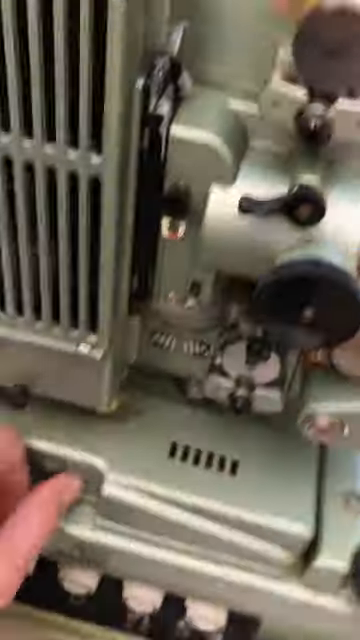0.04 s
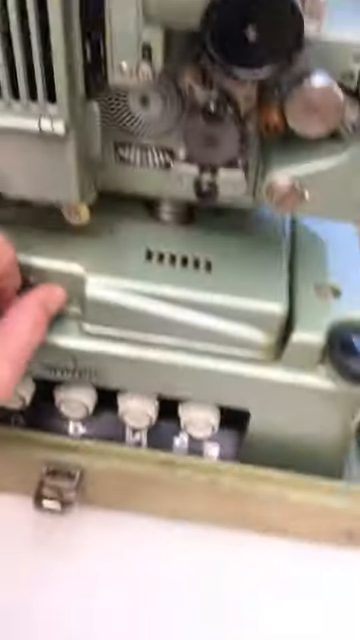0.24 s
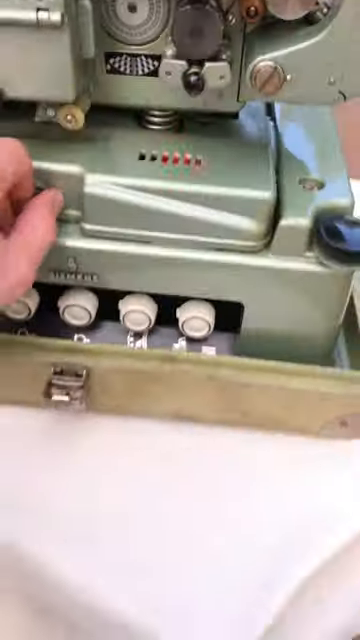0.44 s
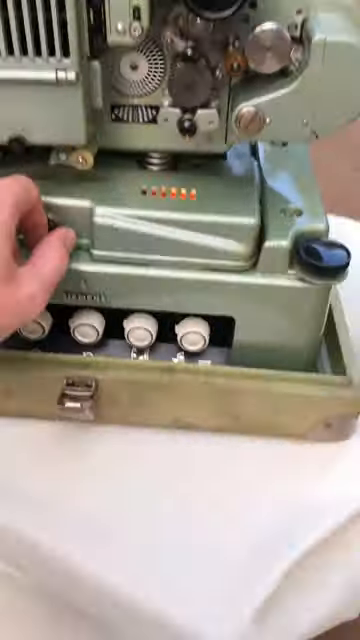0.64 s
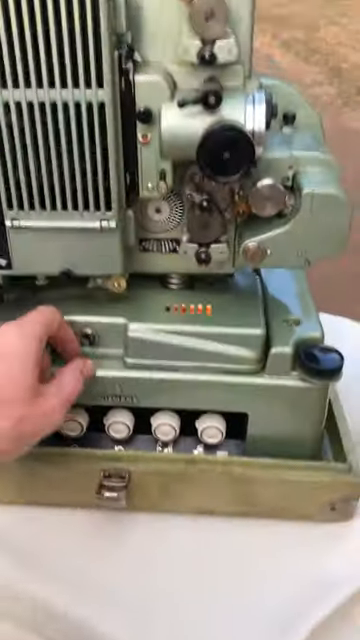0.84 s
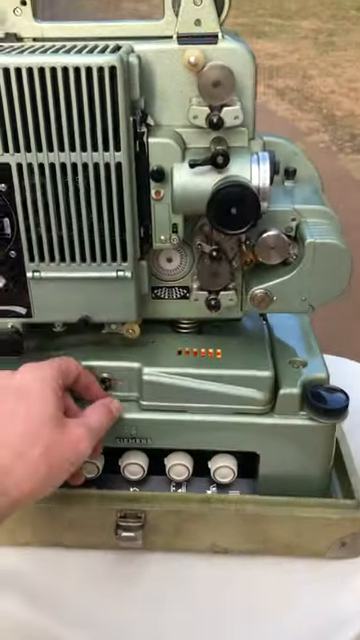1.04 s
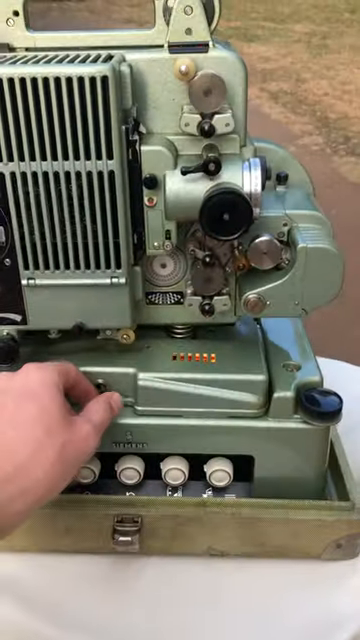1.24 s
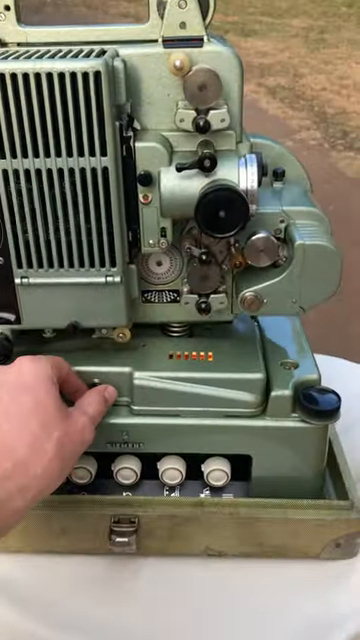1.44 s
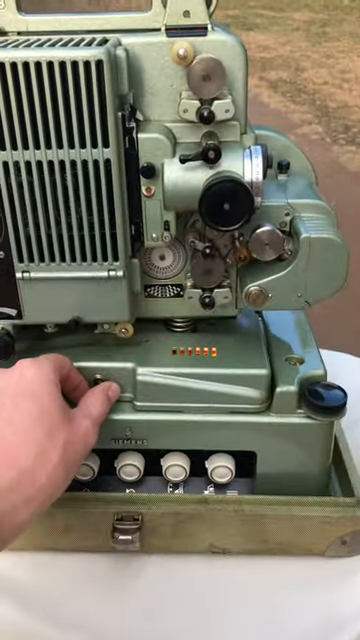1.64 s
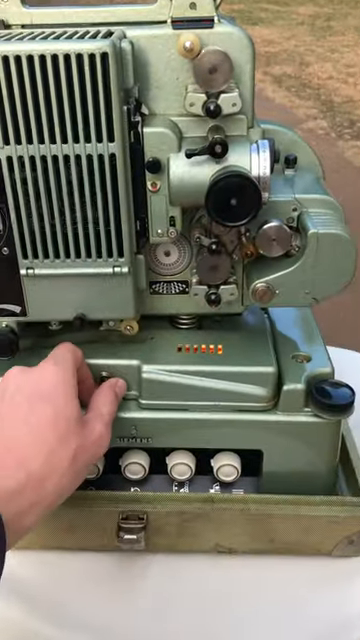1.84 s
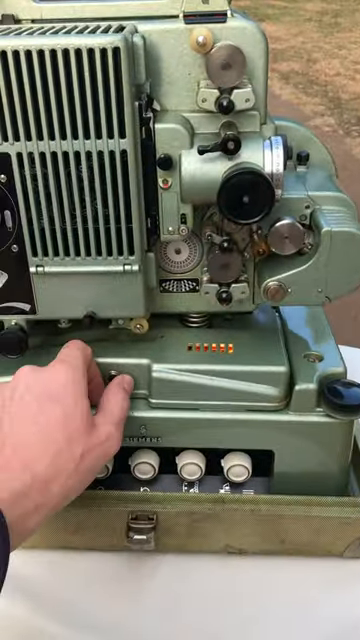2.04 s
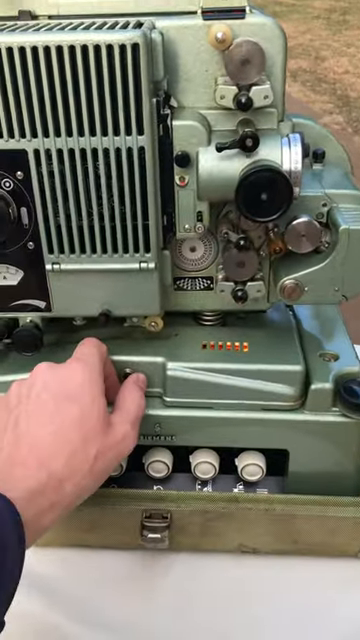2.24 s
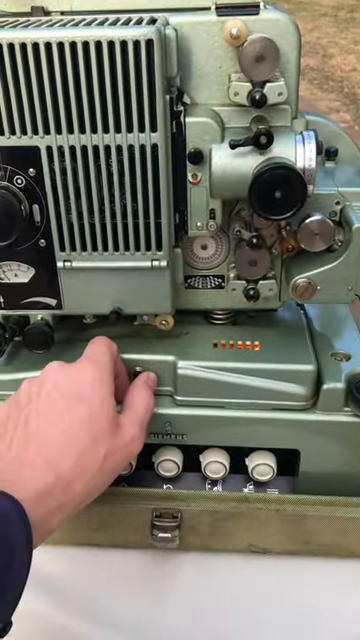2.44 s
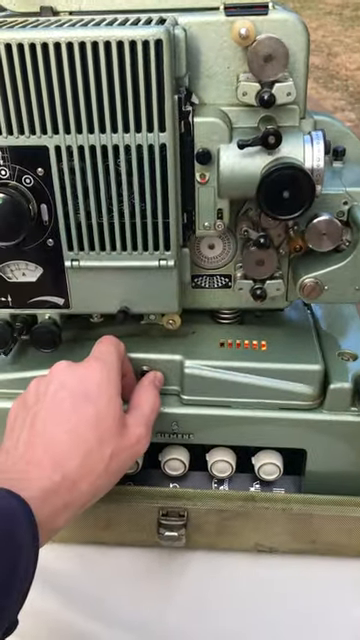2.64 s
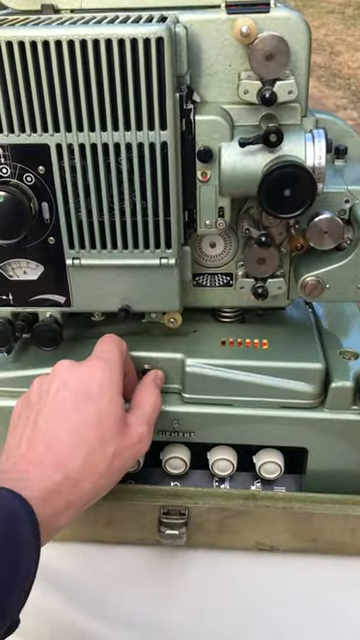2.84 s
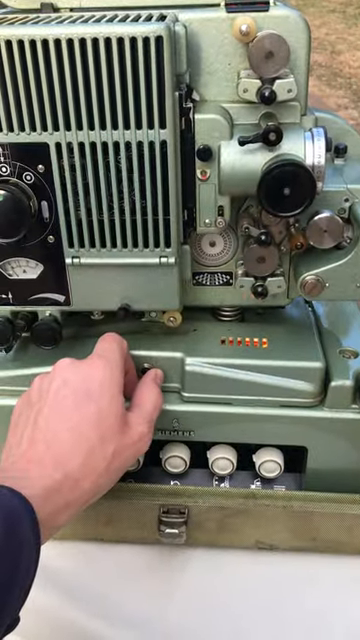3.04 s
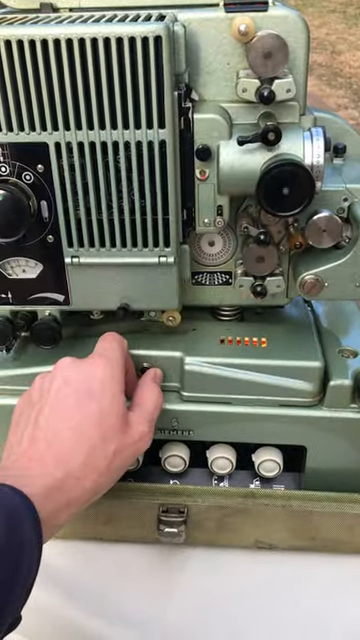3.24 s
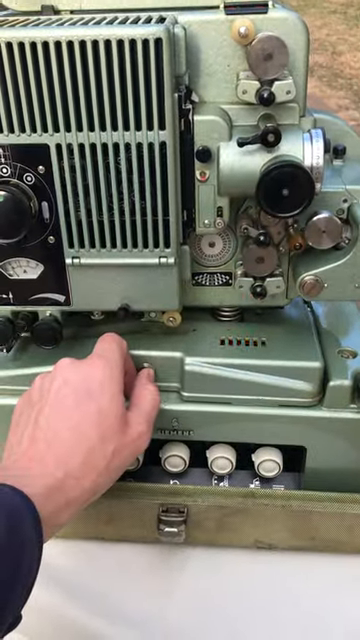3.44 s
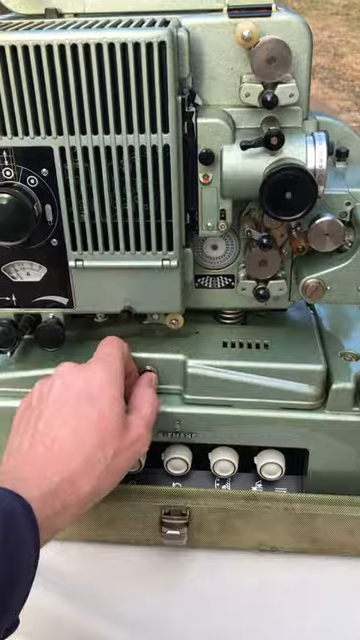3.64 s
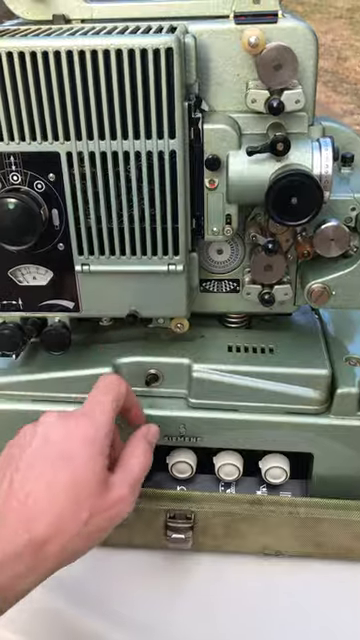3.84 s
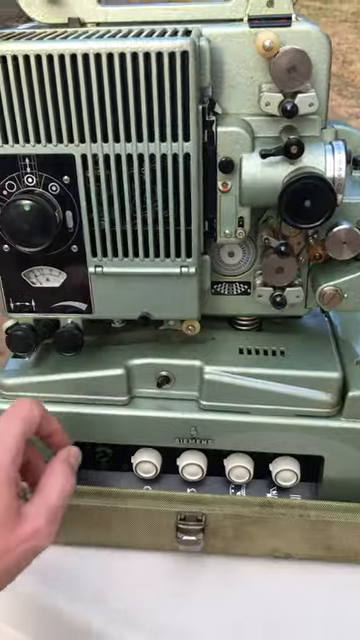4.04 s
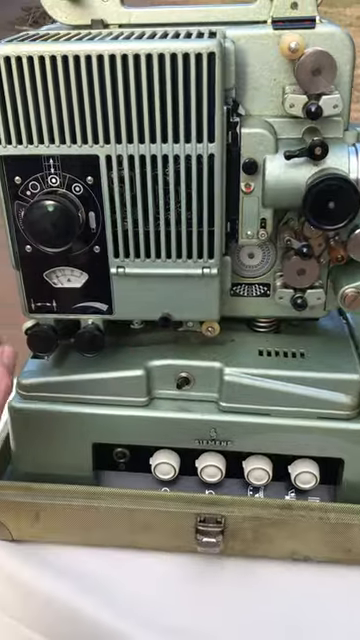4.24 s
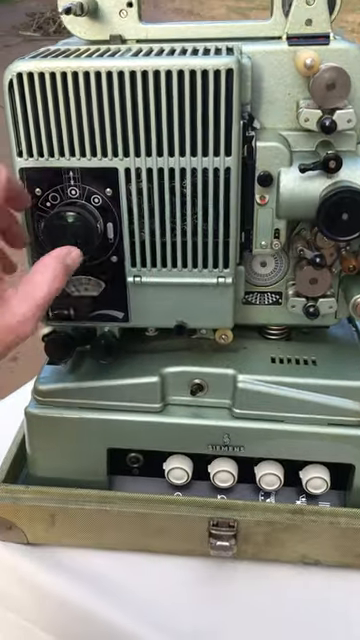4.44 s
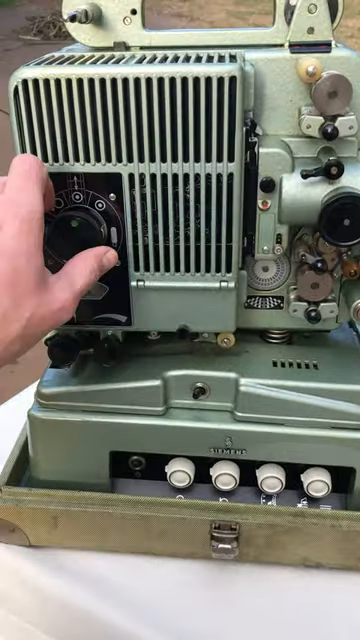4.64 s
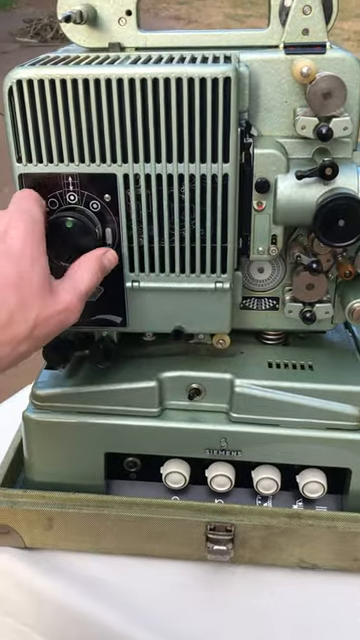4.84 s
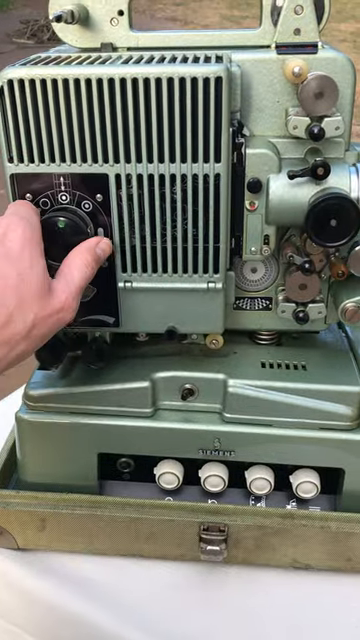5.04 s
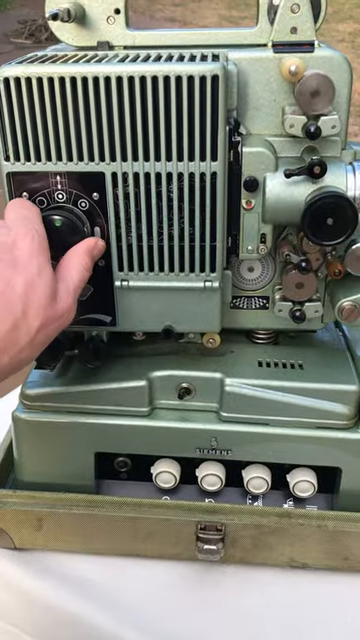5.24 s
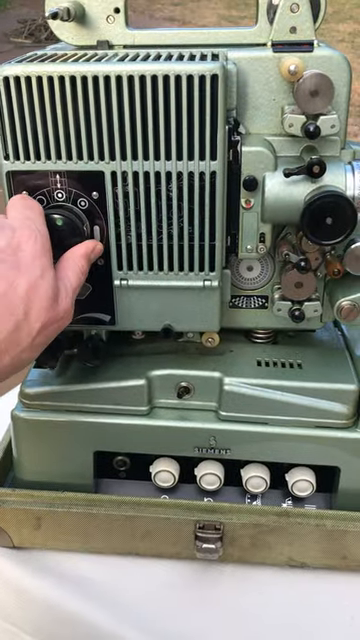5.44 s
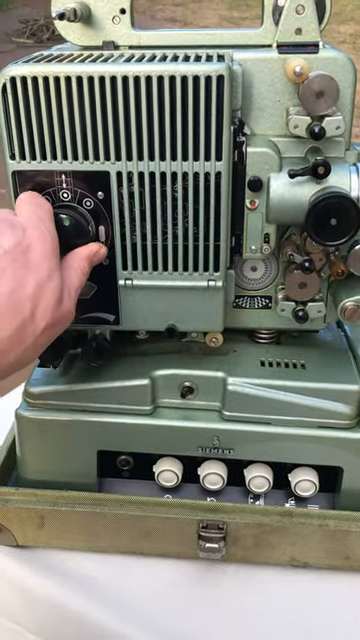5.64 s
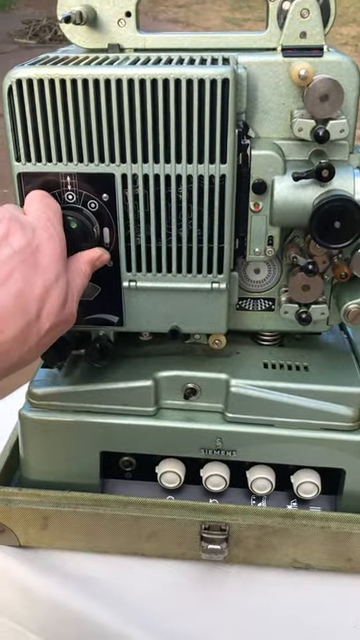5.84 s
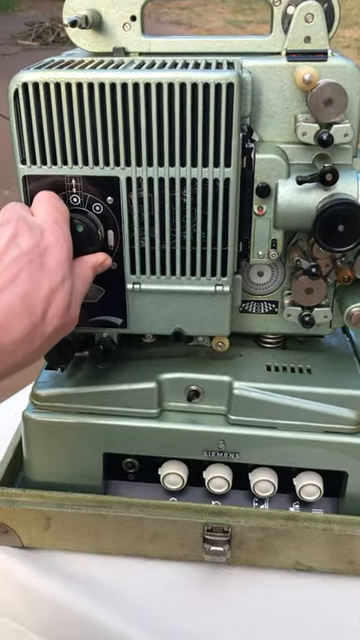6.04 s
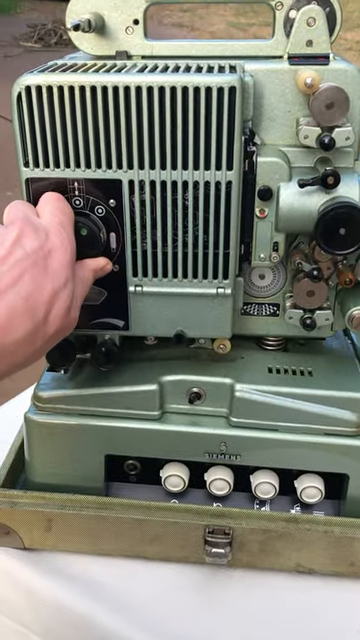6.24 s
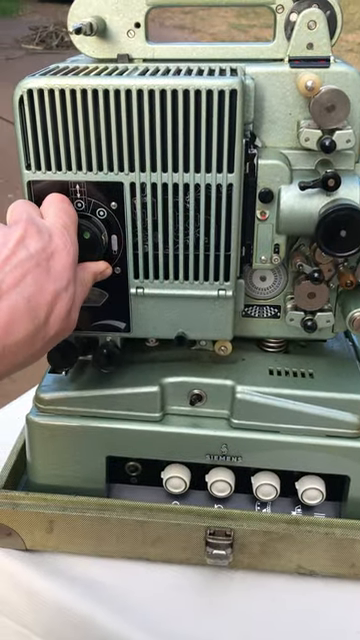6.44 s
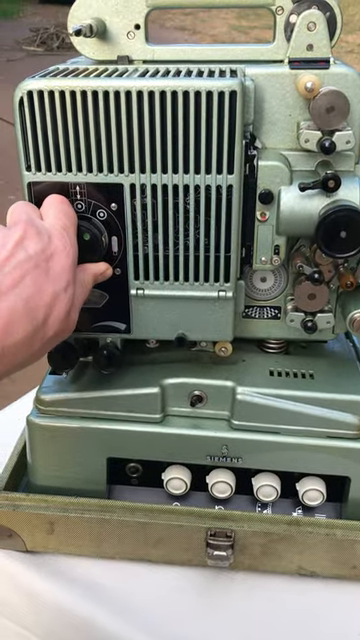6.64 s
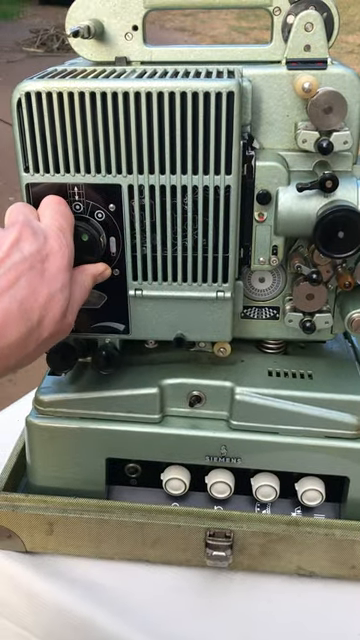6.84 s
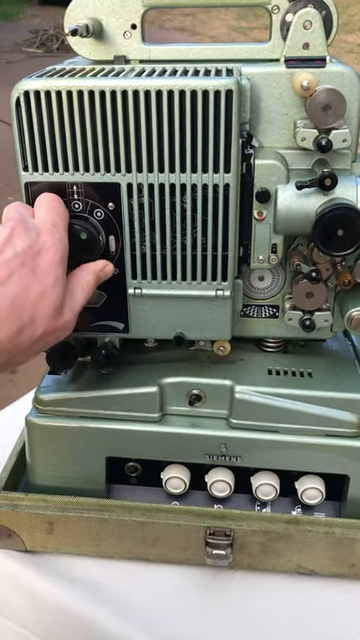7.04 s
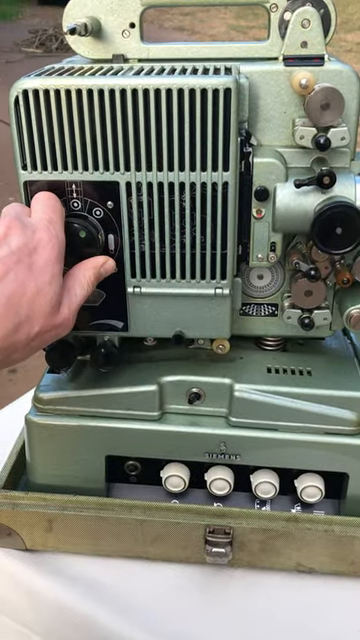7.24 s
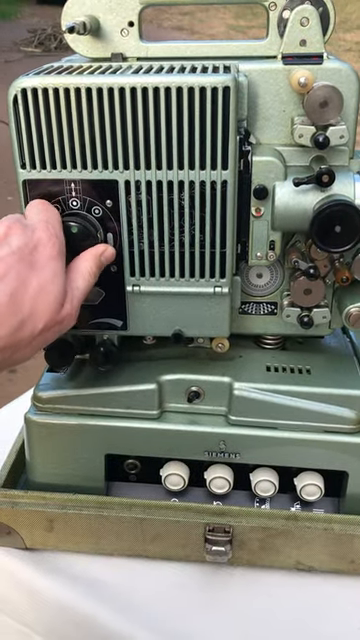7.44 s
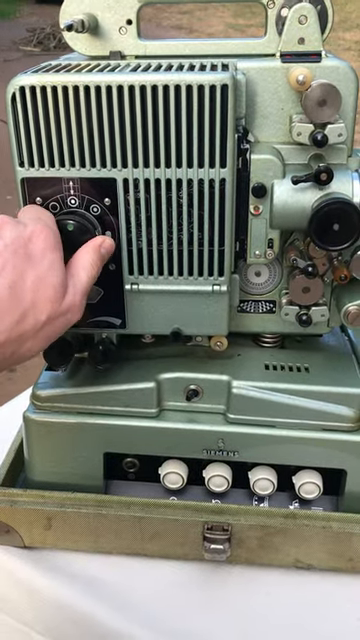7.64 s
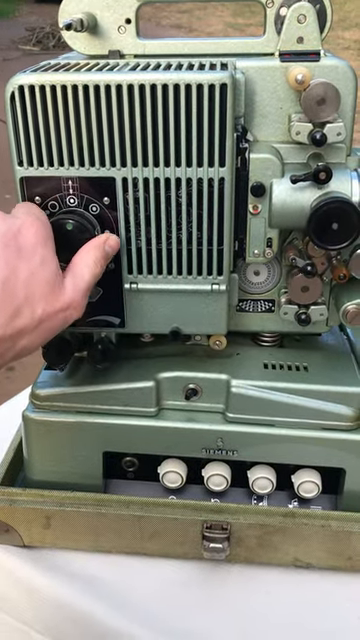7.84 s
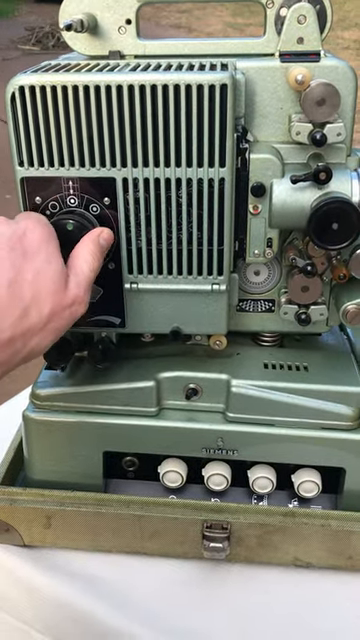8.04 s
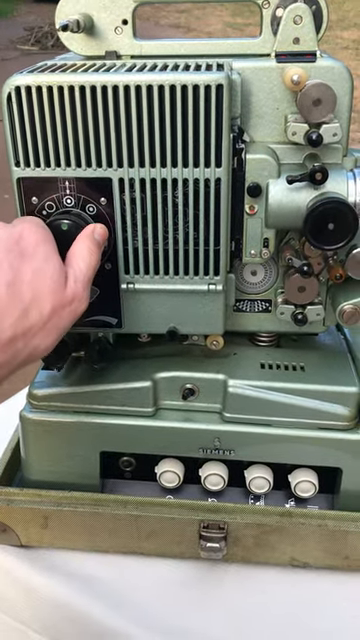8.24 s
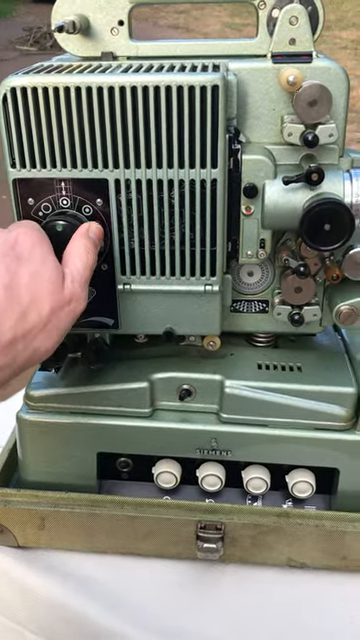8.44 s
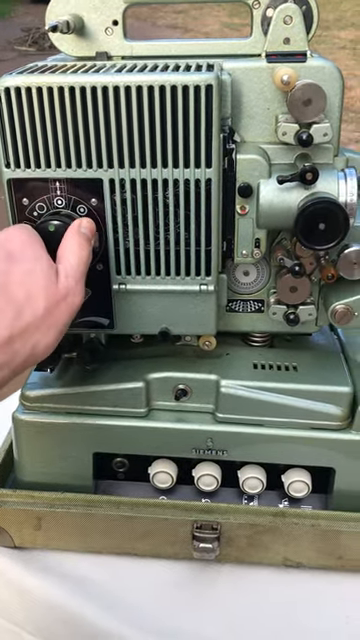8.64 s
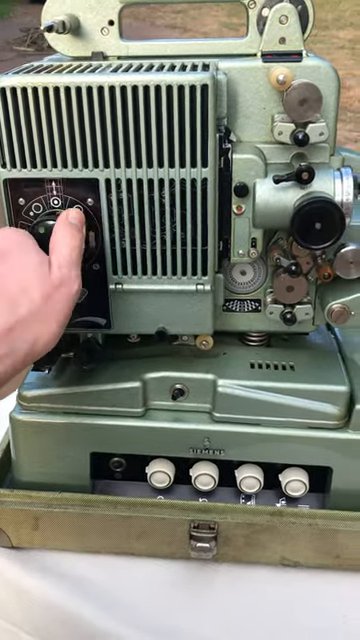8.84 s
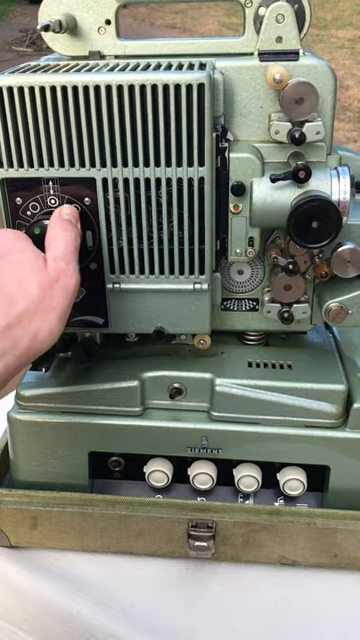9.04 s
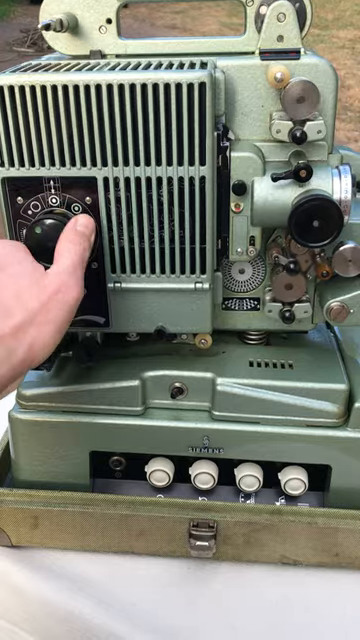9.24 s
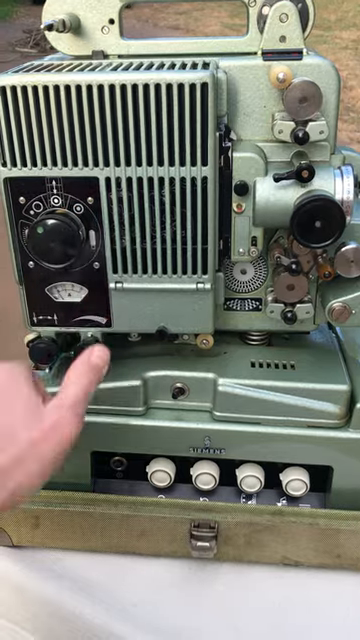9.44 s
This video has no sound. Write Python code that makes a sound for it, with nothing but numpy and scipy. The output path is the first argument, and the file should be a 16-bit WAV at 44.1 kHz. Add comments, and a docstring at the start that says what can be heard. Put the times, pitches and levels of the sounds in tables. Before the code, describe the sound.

A film projector is already running outdoors, with a rapid, even mechanical clatter over a rushing cooling fan, gear whine and motor hum. For the first half second it is very close, louder and hollower, with a thin scraping hiss; then it settles at arm's length. A toggle switch snaps sharply at about 0.4 seconds and again at 3.4. The machine runs on steadily, its clatter growing slightly faster and harder, with a barely audible tick around 5.5 seconds. At about 8.9 seconds a rotary switch clacks and cuts the motor. The clatter and whine die quickly, while the fan's whir slows, dulls and fades, with two small clicks at about 9.1 and 9.5 seconds. Very faint open-air noise lies behind everything, along with a faint low drone during the first two seconds.

```python
"""Outdoors, a 16 mm film projector runs on a table, heard up close at first, then from arm's length.
The claw that pulls the film clatters about 32 times a second over gear whine, motor hum and the
rush of the cooling fan. A toggle switch snaps on and off; then a rotary switch cuts the motor
and the machine coasts down. A low drone and faint open-air noise lie behind it."""
import sys
import numpy as np
from scipy import signal
from scipy.fft import rfft, irfft, next_fast_len
from scipy.io import wavfile
from scipy.ndimage import uniform_filter1d

SR = 44100
rng = np.random.default_rng(int(sys.argv[2]) if len(sys.argv) > 2 else 0)


def log_audio(samples):
    """Write samples as a 16-bit WAV file to the path given in sys.argv[1]."""
    # one column per channel
    frames = np.atleast_2d(samples).T
    # limit to full scale, then quantise
    limited = np.clip(frames, -1, 1)
    pcm = np.round(limited * 32767).astype(np.int16)
    wavfile.write(sys.argv[1], SR, pcm)


N = 418931
TIME_S = np.arange(N) / SR


def undb(db):
    """Turn decibels into a number to multiply by."""
    return 10 ** (np.asarray(db) / 20)


def unit(x):
    """Scale a signal so its average strength (rms) is 1."""
    return x / np.sqrt(np.mean(x ** 2))


def curve(rows):
    """Join (time_s, value) points with straight lines."""
    return np.interp(TIME_S, *np.transpose(rows))


def wander(rate_hz):
    """A smooth random drift, about 1 in size."""
    hold = int(SR / rate_hz)
    steps = np.repeat(rng.standard_normal(N // hold + 1), hold)
    return unit(uniform_filter1d(uniform_filter1d(steps, hold), hold)[:N])


def noise(points):
    """Noise whose lows and highs follow (pitch_hz, relative_db) points."""
    hz, db = np.transpose(points)
    size = next_fast_len(N)
    freqs = np.maximum(np.fft.rfftfreq(size, 1 / SR), 1)
    gain = undb(np.interp(np.log(freqs), np.log(hz), db))
    bass_cut = np.minimum(freqs / hz[0], 1) ** 2
    return unit(irfft(rfft(rng.standard_normal(size)) * gain * bass_cut)[:N])


def resonate(x, hz, width_hz):
    """Make a sound ring at one pitch; a narrower width rings longer."""
    return signal.lfilter(*signal.iirpeak(hz, hz / width_hz, fs=SR), x + 1e-18)


def ring(x, modes):
    """Make a sound ring at several pitches; neighbours swing in opposite directions."""
    return sum((-1) ** k * undb(db) * resonate(x, hz, width) for k, (hz, width, db) in enumerate(modes))


def die_away(decay_s, size=4096):
    """The fading outline of the rattle after a hit, with energy 1."""
    fade = np.exp(-np.arange(size) / SR / decay_s)
    return fade / np.sqrt(np.sum(fade ** 2))


def rebounds(decay_s, size=4096):
    """The tiny bounces after one hit, with energy 1."""
    fade = die_away(decay_s, size)
    rattle = rng.standard_normal(size)
    for _ in range(3):
        spectrum = rfft(rattle * fade ** .5)
        rattle = irfft(spectrum / np.abs(spectrum))  # make all pitches equally strong
    rattle = rattle * fade ** .1
    return rattle / np.sqrt(np.sum(rattle ** 2))


def strokes(turn, contacts, scatter_db, loose_db, slop_s):
    """Each contact rattles the same way once a turn, with a little loose chatter on top."""
    knocks, power = np.zeros(N), np.zeros(N)
    for share, db, decay_s in contacts:
        at = np.flatnonzero(np.diff(np.floor(turn - share)) > 0)
        late, harder = rng.standard_normal((len(at), 2)).T
        at = np.clip(at + np.round(slop_s * SR * late).astype(int), 0, N - 1)
        hits = np.zeros(N)
        hits[at] = undb(db + scatter_db * harder)
        knocks += signal.oaconvolve(hits, rebounds(decay_s))[:N]
        power += signal.oaconvolve(hits ** 2, die_away(decay_s) ** 2)[:N]
    return knocks + undb(loose_db) * np.sqrt(np.abs(power)) * rng.standard_normal(N)


def tones(turn, rows, waver_db, waver_hz):
    """Tones that follow a turning shaft, each wavering in strength."""
    return sum(undb(db + waver_db * wander(waver_hz)) * np.sin(2 * np.pi * (cycles * turn + rng.random()))
               for cycles, db in rows)


# The noise of the open air: pitch_hz, relative_db
OPEN_AIR = [(25, -21), (45, 7.5), (80, 0.5), (160, -0.5), (500, -6.5), (1200, -8.5), (4000, -21),
            (15000, -77)]
def background():
    """Faint open-air noise and a wavering low drone that sags, then drops away early on."""
    pitch_hz = 58 + 3.54 * wander(14)
    drone = undb(2 * wander(6.4)) * np.sin(2 * np.pi * np.cumsum(pitch_hz) / SR)
    dropped = np.clip((TIME_S - 1.86) / .15, 0, 1)
    drone_db = (1 - dropped) * (-46.5 - 3.5 * TIME_S) - 62 * dropped
    return undb(drone_db) * unit(drone) + undb(-53) * noise(OPEN_AIR)


CUT_S, COAST_S = 8.888, .9
def coast():
    """Share of full speed: 1 until the motor is cut, then friction slows it."""
    return np.exp(-np.maximum(TIME_S - CUT_S, 0) / COAST_S)


# The powered drive speeds up a little as it warms: time_s, frames_per_s
RUNNING_SPEED = [(0, 31.292), (3, 31.771), (3.8, 32.045), (5.9, 32.202), (6.8, 32.462), (8.88, 32.659)]
def shaft_turns():
    """How many turns the shutter shaft has made, one for each film frame."""
    return .17 + np.cumsum(curve(RUNNING_SPEED) * coast()) / SR


def extra_speed():
    """Frames a second gained by warming up."""
    return curve(RUNNING_SPEED) - RUNNING_SPEED[0][1]


# The listener starts near the housing and draws back: time_s, closeness (1 nearest, 0 arm's length)
CLOSENESS = [(0, 0.88), (.2, 0.7), (.42, 0.31), (.52, -0.16), (1.3, -0.38), (2.4, -0.17)]
def loudness(db, close_db, speed_power):
    """A moving part is louder up close and fades as the machine coasts down."""
    return undb(db + close_db * curve(CLOSENESS)) * coast() ** speed_power


# Air rushing through the fan and grille: pitch_hz, relative_db
FAN_AIR = [(40, -29), (90, -18.5), (140, -23.5), (250, -12.5), (420, -11), (650, -6), (900, 2.5),
           (1120, -3), (1400, -3), (1620, -12), (2400, -8), (3700, -13), (4700, -18), (6600, -19.5),
           (10600, -29.5), (15500, -30)]
def fan(turn):
    """Air, lightly chopped by the shutter, dulls as it slows; up close the hollow lamp house rings."""
    close = curve(CLOSENESS)
    chop = 1 + .13 * np.cos(2 * np.pi * (turn - .15))
    hollow = unit(resonate(resonate(rng.standard_normal(N), 904, 230), 904, 230))
    air = noise(FAN_AIR)
    hiss = signal.sosfiltfilt(signal.butter(2, 1700, "high", fs=SR, output="sos"), air)
    air = air - (1 - coast() ** .66) * hiss
    rush = undb(-.3 - .35 * close) * air + undb(-20.5 + 19.6 * close) * hollow
    return undb(-.72 + .2 * wander(11)) * chop * rush


# The whine of the gears: cycles_per_frame, relative_db
GEAR_TONES = [(5, -13), (6, -8.5), (9, -9.5), (11, -16), (13, -13), (15, -9), (16, -9.5), (17, -7.5),
              (18, 0.5), (20, 0), (21, 3), (24, -35), (30, 2.5), (31, 0.5), (34, 3), (37, 6), (39, 4),
              (40, 6), (44, -9), (53, -4.5), (60, -6)]
# The motor's hum and the whine of its sliding contacts: cycles_per_motor_turn, relative_db
MOTOR_TONES = [(1, -6), (2, -20.5), (3, 4.5), (9, -26), (24, 1)]
MOTOR_TURNS_PER_FRAME = 2.8185
def gears_and_motor(turn):
    """Gears whine and the motor hums; the note of the fan blades is heard only near the grille."""
    close = np.maximum(curve(CLOSENESS), 0)
    gears = unit(tones(turn + .0005 * wander(25), GEAR_TONES, waver_db=1.04, waver_hz=9))
    motor_turn = MOTOR_TURNS_PER_FRAME * turn + .011 * wander(6)
    motor = unit(tones(motor_turn, MOTOR_TONES, waver_db=.2, waver_hz=7))
    blades = np.sin(2 * np.pi * 7 * motor_turn)
    whine = undb(-6.5) * gears + undb(-15 - .5 * close) * motor + undb(-8) * np.sqrt(close) * blades
    return coast() ** 6 * whine


# The film guide's hiss changes pitch with the listening angle: time_s, pitch_hz
GUIDE_PITCH = [(.13, 6380), (.17, 5500), (.26, 5500), (.3, 8700)]
def film_guide(turn):
    """A thin scraping hiss that swells each time the claw slides back."""
    band = unit(signal.sosfilt(signal.butter(2, 400, fs=SR, output="sos"), rng.standard_normal(N)))
    hiss = band * np.sin(2 * np.pi * np.cumsum(curve(GUIDE_PITCH)) / SR)
    swell = np.exp(1.8 * np.cos(2 * np.pi * (turn - .35)))
    return unit(swell * hiss)


# The claw's knocks as it pulls down and goes back also thump the cast body: share_of_turn, relative_db, decay_s
BODY_THUMPS = [(.985, -1, 0.000096), (.34, -4.5, 0.00022), (.68, -9, 0.00024)]
# Two close ringing notes of the cast metal body: pitch_hz, width_hz, relative_db
BODY_NOTES = [(1216, 151, 2.5), (1313, 193, 0)]
def body_thumps(turn):
    """The claw's knocks thump the body, whose two notes beat, so each thump swells before it dies."""
    thumps = strokes(turn, BODY_THUMPS, scatter_db=1.2, loose_db=-8, slop_s=.00006)
    return undb(-7.5 + .5 * extra_speed()) * unit(ring(thumps, BODY_NOTES))


# The ringing of the switch panel: pitch_hz, width_hz, relative_db
PANEL_NOTES = [(1450, 150, 5.5), (2350, 430, 2), (3100, 1000, -1.5), (4030, 270, 0.5), (5700, 370, -4.5),
               (6540, 190, -2.5), (8020, 610, -5), (9600, 640, -1), (9800, 1100, -3.5), (12000, 830, -5),
               (15100, 1200, -4)]
def panel_click(start_s, db, decay_s, hz, width_hz, size=4096):
    """A spring chatters and rings the panel; db is the level if the click were spread over 10 ms."""
    out = np.zeros(N + size)
    click = ring(resonate(rebounds(decay_s), hz, width_hz), PANEL_NOTES)
    at = int(start_s * SR)
    out[at:at + size] = undb(db) * click / np.sqrt(np.sum(click ** 2) / (SR / 100))
    return out[:N]


# Snaps of the switches and clacks of the mechanism:
# start_s, tick_lead_s, tick_db, tick_hz, crack_db, knock_db, knock_hz, knock_width_hz, decay_s
SWITCH_SNAPS = [(0.4488, 0.00072, -31, 6240, -19.5, -19.5, 1590, 1390, 0.0023),
                (3.4374, 0.0014, -20.5, 9100, -19, -17.5, 1700, 1800, 0.0053),
                (5.5356, 0.0011, -52, 6140, -44, -41, 3520, 4000, .001),
                (8.881, .004, -34, 14900, -22.5, -24, 3830, 550, 0.0053),
                (9.11, .02, -52, 3000, -63, -41, 2000, 3000, 0.016),
                (9.4705, .0015, -48, 5000, -72, -37.5, 1500, 1800, 0.002)]
def switches():
    """In each snap a tick comes first, the spring cracks brightly, and the lever knocks home."""
    out = np.zeros(N)
    for start_s, lead_s, tick_db, tick_hz, crack_db, knock_db, knock_hz, width, decay_s in SWITCH_SNAPS:
        out += panel_click(start_s - lead_s, tick_db, decay_s=.00066, hz=tick_hz, width_hz=1700)
        out += panel_click(start_s, crack_db, decay_s, hz=7540, width_hz=9300)
        out += panel_click(start_s + .0003, knock_db, decay_s, knock_hz, width)
    return out


# The claw's hits as it pulls the film down, and as it goes back: share_of_turn, relative_db, decay_s
PULL_HITS = [(0.98, -5, 0.00071), (0.0299, -19.5, 0.0023), (.09, -18.5, 0.0011)]
RETURN_HITS = [(.285, -2.5, 0.0016), (.32, -3, 0.0011), (.35, -4.5, 0.0034), (.46, -15, 0.0022),
               (.655, -4, 0.002), (.755, -15.5, 0.0017)]
# The ringing of the housing and the gate that holds the film: pitch_hz, width_hz, pull_db, return_db
GATE_NOTES = [(2150, 110, -3, -0.5), (2750, 330, -4, -3), (3248, 335, 10.5, 0), (3634, 230, -1, -1),
              (4027, 225, -13, -1), (5397, 143, 1, 1.5), (6370, 880, -7, -6), (7275, 315, -1, -5.5),
              (8210, 430, -11, -9), (9800, 630, -11, -10.5), (11640, 720, -22, -13),
              (13400, 610, -12.5, -12.5), (15600, 470, -12.5, -24)]
def claw(turn):
    """The claw snaps down sharply, then scrapes back a third of a turn later; both ring the gate."""
    pull = strokes(turn, PULL_HITS, scatter_db=.6, loose_db=-18, slop_s=.00002)
    back = strokes(turn, RETURN_HITS, scatter_db=.8, loose_db=-5, slop_s=.00006)
    pull = ring(pull, [(hz, width, db) for hz, width, db, _ in GATE_NOTES])
    back = ring(back, [(hz, width, db) for hz, width, _, db in GATE_NOTES])
    bite_db = -5.2 + 3.8 * extra_speed() + 3.5 * curve(CLOSENESS)  # harder when faster or nearer
    return undb(bite_db) * unit(pull) + undb(-3) * unit(back)


def scene():
    """One turning shaft keeps the moving parts in step; the switches and background are added on."""
    turn = shaft_turns()
    whir = loudness(-31, close_db=2.3, speed_power=3.45) * (fan(turn) + gears_and_motor(turn) + body_thumps(turn))
    clatter = loudness(-37.5, close_db=3.3, speed_power=8.6) * claw(turn)
    hiss = loudness(-60.5, close_db=21, speed_power=6) * film_guide(turn)
    return (whir + clatter + hiss + switches() + background())[None]


def record(dry):
    """A phone microphone thins the deep bass, rounds the loudest peaks and cuts the highest treble."""
    thinned = signal.sosfilt(signal.butter(4, 36, "high", fs=SR, output="sos"), dry)
    rounded = .75 * np.tanh(thinned / .75)
    return signal.sosfilt(signal.ellip(10, .2, 70, 15750, fs=SR, output="sos"), rounded)


dry = scene()
out = record(dry)
log_audio(out)
```